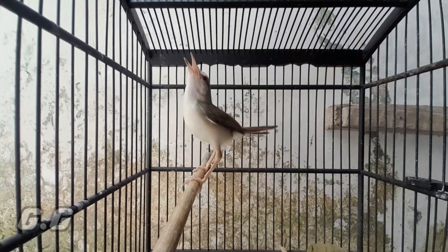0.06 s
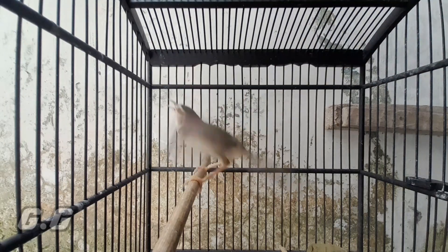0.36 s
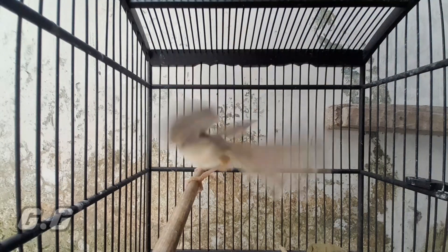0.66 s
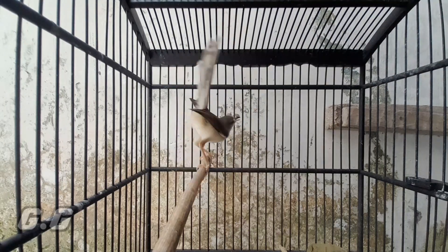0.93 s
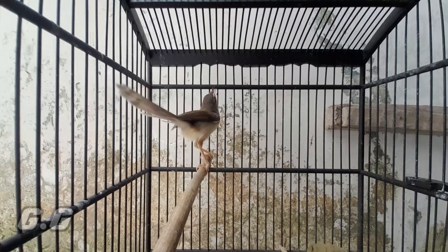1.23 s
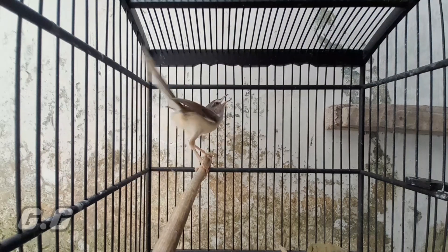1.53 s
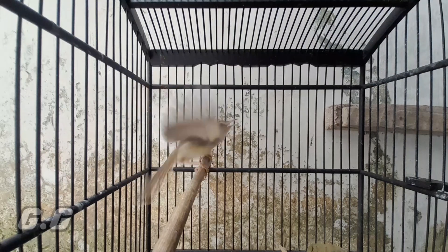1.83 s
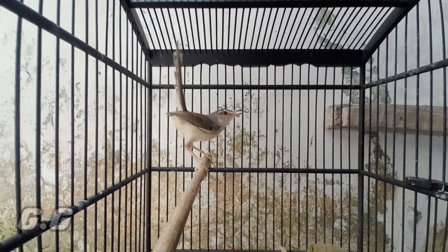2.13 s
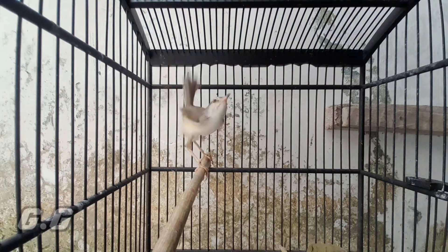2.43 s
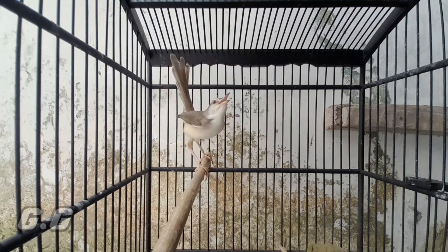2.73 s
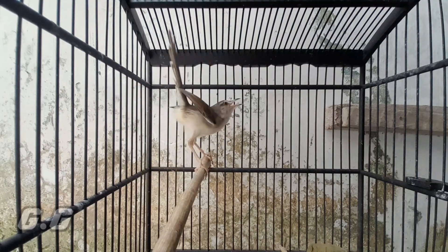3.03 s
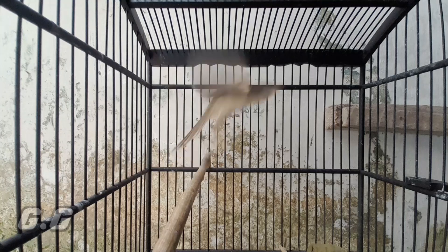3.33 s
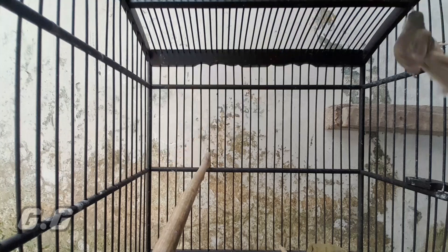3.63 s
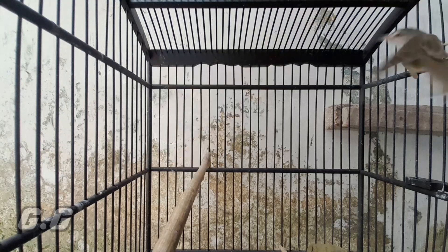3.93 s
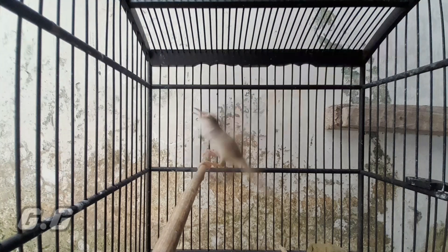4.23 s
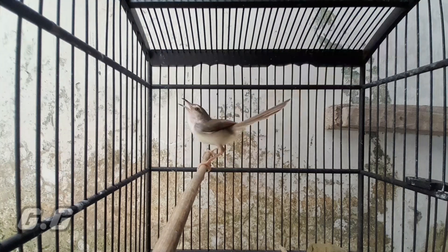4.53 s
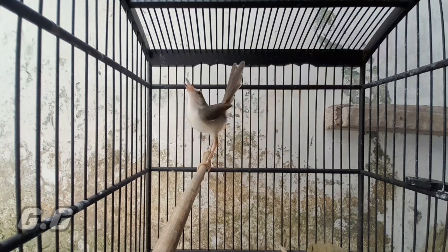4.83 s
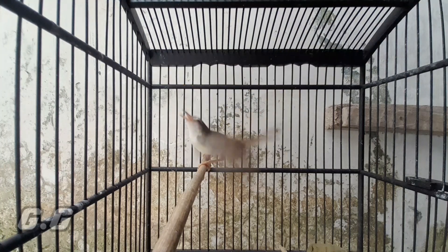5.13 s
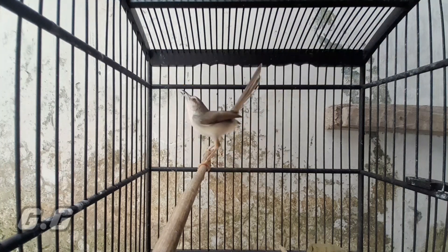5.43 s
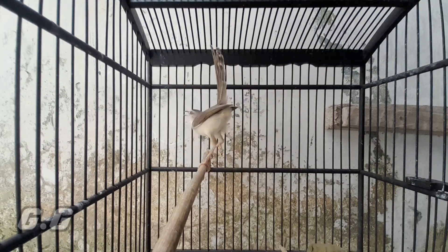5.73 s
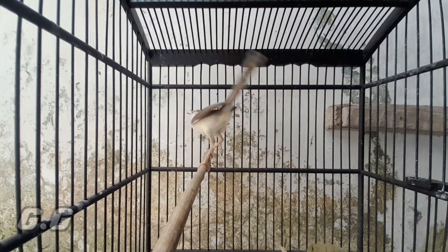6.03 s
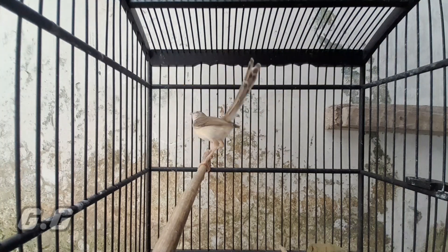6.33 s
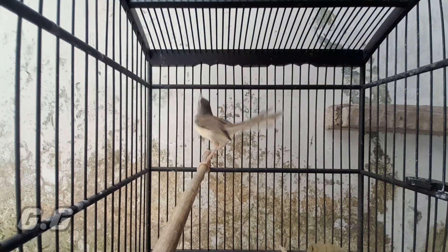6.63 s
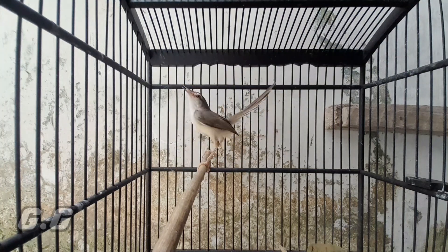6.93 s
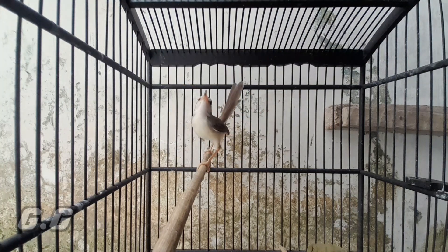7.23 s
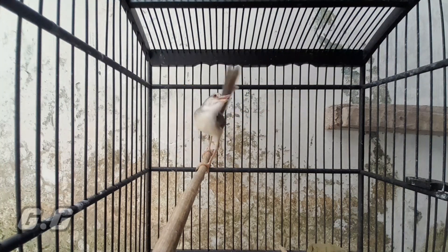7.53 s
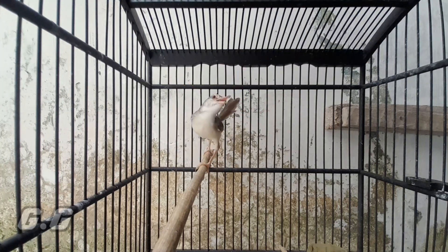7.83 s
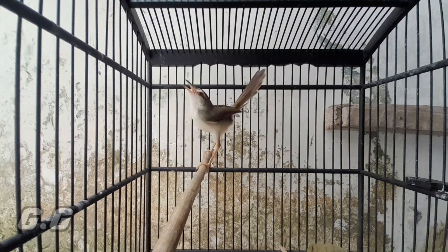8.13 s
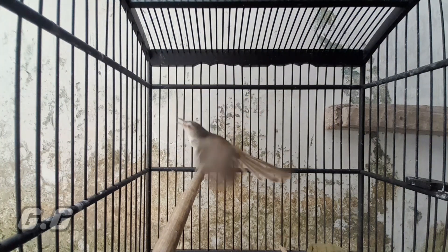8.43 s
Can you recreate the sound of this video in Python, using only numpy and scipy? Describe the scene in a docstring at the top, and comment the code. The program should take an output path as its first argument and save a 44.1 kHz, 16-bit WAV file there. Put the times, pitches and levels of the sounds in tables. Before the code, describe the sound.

Close, high chirps repeat steadily from a caged songbird, mixed with sharp wing flicks over a distant engine hum.

```python
"""A caged prinia close to a stereo microphone, with a street far behind.
From the start it repeats one arching note, a hoarse squeak of the syrinx breaking into a whistle,
and snaps its wings as it hops; the nearby walls ring. Farther off, other birds tick and whistle.
From about 1 s its claws now and then scratch perch and bars. It rests just after 2 s, sings on as
a far engine's hum swells toward 5.5 s, rests again just after 6 s, then sings to the end."""
import sys
import numpy as np
from scipy import signal
from scipy.fft import rfft, irfft, next_fast_len
from scipy.io import wavfile

SR = 44100
rng = np.random.default_rng(int(sys.argv[2]) if len(sys.argv) > 2 else 0)


def pcm_store(signal):
    """Save signal as 16-bit PCM."""
    levels = np.round(np.clip(np.atleast_2d(signal), -1, 1) * 32767)
    wavfile.write(sys.argv[1], SR, levels.astype(np.int16).T)


N = 377937

# Levels in the tables are relative: each source adds its own gain.
# the far street swells and ebbs: t/s, engine level/dB, traffic level/dB
STREET_LEVELS = [(0.0, -61, -64), (2.0, -54, -62.5), (2.51, -61, -69.5), (2.86, -55, -62.5),
                 (3.15, -53, -63.5), (3.77, -57.5, -64), (4.58, -50, -59.5), (5.66, -49, -56),
                 (6.49, -56, -60.5), (6.95, -51.5, -57), (8.28, -56.5, -65.5), (8.57, -55.5, -62)]
# partials of the far engine: multiple of the hum, level/dB
ENGINE_ORDERS = [(.5, -12), (.75, -10.5), (1, 0.5), (1.5, -15.5), (2, -19.5), (3, -20)]
# spectrum of the traffic wash: f/Hz, level/dB
TRAFFIC_COLOUR = [(25, -17.5), (60, -5), (100, 4), (160, 4), (260, -6.5), (370, -6), (480, -15.5),
                  (700, -20), (1150, -28.5), (1450, -25.5), (2500, -27.5), (6000, -39.5), (15500, -54.5)]
# another engine pulls away far off: t/s, length/s, first f/Hz, last f/Hz, level/dB
REVS = [(-.2, .8, 187, 202, -56.5), (2.3, 1.5, 180, 204.4, -56)]
# a distant bird's soft slurs: t/s, length/s, first f/Hz, last f/Hz, level/dB
SLURS = [(0.239, 0.11, 1640, 1614, -67), (0.903, 0.21, 1494, 1500, -64.5), (5.843, 0.097, 1300, 1500, -63),
         (6.132, .15, 1430, 1298, -61), (7.842, 0.1, 1444, 1330, -65), (8.3, 0.13, 1380, 1356, -60)]
# a second bird ticks in even runs: first t/s, last t/s, level/dB
TICK_RUNS = [(0.242, 0.688, -48), (2.155, 2.327, -47.5), (2.546, 2.903, -51), (4.815, 5.446, -44.5),
             (5.799, 6.377, -41.5), (6.466, 6.559, -43)]
# ring of the walls around the cage: f/Hz, t60/s
WALL_DECAY = [(100, 0.098), (600, 0.44), (2000, 0.33), (3900, 0.42), (7000, 0.22), (12000, 0.4),
              (16000, 0.08)]
# the raised bill beams its overtones at the walls, so they return stronger: f/Hz, level/dB
WALL_COLOUR = [(300, 2.5), (1000, 1), (2500, 6), (3900, 1.5), (5600, 4), (8000, 4), (12000, 0), (16000, -5)]
# claws grip perch and bars: t/s, level/dB
GRIPS = [(0.964, -40), (1.047, -44), (3.6117, -27), (3.643, -37), (4.131, -37), (4.385, -44)]
# wing flicks, each one or two strokes, a push of air and a ruffle: last stroke t/s, strokes,
# level/dB, growth per stroke/dB, treble/dB, left-right/dB, air level/dB, ruffle level/dB
FLICKS = [(0.429, 2, -22.5, -2.5, 3.5, 4.5, -33, -62), (0.798, 2, -20, -0.5, -0.5, -3, -37, -63),
          (1.109, 1, -20, -3, 4.5, 8, -44, -64), (1.519, 2, -21, 2, 1.5, -4.5, -38, -46.5),
          (1.886, 1, -25, 2, 7.5, -5, -40, -50.5), (2.423, 1, -26.5, -2, 2, 3.5, -48, -76),
          (2.945, 2, -20, 2.5, 4.5, 4.5, -38.5, -60), (3.383, 2, -19, 8.5, 1, -4, -37.5, -66),
          (4.018, 1, -24.5, 0, -0.5, -8, -55, -62), (4.309, 2, -21.5, -3.5, 0, -5, -42, -50),
          (4.734, 2, -18, 14.5, 1, -3.5, -41.5, -52.5), (5.248, 2, -21, 2.5, 4.5, 4.5, -43, -57),
          (5.643, 2, -20, 7, 0.5, -6, -45, -68), (6.036, 2, -23.5, 14.5, 0.5, 2.5, -55, -57),
          (6.479, 1, -22.5, -1, -1, -2.5, -55, -71), (7.497, 2, -23, 6, -5, -7.5, -56, -50.5),
          (8.087, 2, -21, 5, 1, -2, -42, -54), (8.544, 2, -24.5, 5.5, 1.5, 0, -40, -44)]
# spectrum of a wing snap: f/Hz, level/dB
SNAP_COLOUR = [(30, -27), (70, -3), (150, -3), (300, 6.5), (580, 6), (800, -4.5), (1020, 0.5), (1400, -5.5),
               (2000, -11), (2600, -28), (4500, -20.5), (6500, -39.5), (10000, -21), (15500, -23)]
# what the throat and open bill pass of the weak partials: f/Hz, level/dB
THROAT = [(1500, -65.5), (2000, -63.5), (3800, -53), (4600, -42), (5100, -42), (5450, -41.5), (5750, -62),
          (6150, -55.5), (6700, -57), (7600, -59), (8300, -56.5), (9700, -67.5), (12000, -52), (14500, -66)]
# overtones of the whistle: multiple, level against the whistle/dB
OVERTONES = [(3, -30), (4, -36.5)]
# the prinia's notes, each shifting between left and right: t/s, length/s, pitch factor, crest level/dB,
# fall level/dB, crest left-right/dB, fall left-right/dB, lead at the left microphone/ms
NOTES = [(-0.016, 0.24, 1, 0.5, -1.5, 0.5, 0.5, .24), (0.344, 0.25, 1.002, -1.5, -2, -5.5, 4, 0.24),
         (0.711, 0.25, 0.99, 3.5, -3, 9, -5.5, 0.1146), (1.076, 0.24, 0.99, -6.5, 0, 0, 2.5, .16),
         (1.44, 0.24, 0.99, 1.5, 1, -1.5, 4.5, 0.13), (1.805, 0.25, 1, 1.5, -2.5, 0, 13.5, 0.17),
         (2.617, 0.242, 1.008, 2, -1.5, -2.5, 4, 0.16), (2.978, 0.24, 1, -0.5, -3.5, 5, 7.5, 0.1),
         (3.334, 0.25, 0.99, -2, -5, -2.5, -5, 0.16), (3.728, 0.23, 1, -2.5, -1.5, 9, -5.5, 0.091),
         (4.088, 0.23, 0.99, 0.5, -2.5, -3, 1, 0.18), (4.457, 0.23, 1, -0.5, 0.5, 12, 2, 0.21),
         (4.826, 0.24, 1, -2, -1.5, -3, 7, .21), (5.181, 0.24, 1, -2.5, -3, 7.5, -3.5, 0.21),
         (5.548, 0.24, 0.9985, -7, -2, -5, -4, 0.21), (5.923, 0.24, 1.003, -7.5, -1.5, 10, -12, 0.2),
         (6.65, 0.24, 1.01, -2, -0.5, 6.5, 1, 0.21), (7.014, 0.24, 1.005, 0, 0, -9.5, 14.5, .18),
         (7.383, 0.25, 1.002, 0, -2.5, -13.5, 9, .15), (7.761, 0.24, 1.001, -1, -0.5, -14.5, 11, 0.14),
         (8.126, 0.24, 1.005, -4.5, -1.5, -3, 9, 0.19), (8.486, 0.35, 1, -7.5, -2, -11, -1, .19)]

# times into a note at which its two levels and left-right balances apply
CREST_S, FALL_S = .11, 0.21
# a note opens as a hoarse squeak that scoops up and keeps climbing
SQUEAK_HZ, SCOOP_HZ, SCOOP_S, CLIMB_HZ_PER_S = 3311, 853.5, 0.0076, 4500
# the rasp, and the hiss that comes with it, die away as the membranes settle
RASP_S, HISS_S = 0.079, 0.033
# the voice breaks upward into a pure whistle
BREAK_S, BREAK_WIDTH_S = 0.074, .007
# the whistle holds its top, sags toward a resting pitch and droops as it is cut off
TOP_HZ, HOLD_UNTIL_S, REST_HZ, SAG_S, DROOP_HZ = 4102, .118, 3404.6, .16, 45
# the note swells ever more slowly, holds and is cut off; its crest and fall levels ride on top
HELD_DB, SWELL_DB, SWELL_S, SWELL_POWER, RELEASE_S = -12.5, 33, .19, 1.71, 0.019
# weak partials bite at the onset, stay strong in the squeak, thin at the break and return at the close
BITE_DB, BITE_S, SQUEAK_DB, THIN_DB, RETURN_DB, RETURN_S = 7.5, 0.012, 2, -6, 10, .03


def amp(db):
    """Decibels to gain."""
    return 10 ** (np.asarray(db) / 20)


def unit(x):
    """Scales to rms 1."""
    return x / np.sqrt(np.mean(x ** 2) + 1e-20)


def read(points, hz):
    """Reads a curve on a log-frequency axis."""
    f, value = np.transpose(points)
    return np.interp(np.log(hz + 1), np.log(f + 1), value)


def add(mix, s, sound):
    """Mixes a sound in at time s."""
    at = round(s * SR)
    sound = sound[..., max(-at, 0):]
    part = mix[:, max(at, 0):][:, :sound.shape[-1]]
    part += sound[..., :part.shape[1]]


def pan(db):
    """Left and right gains for a level difference at the microphone."""
    return unit(amp([[db / 2], [-db / 2]]))


def noise(colour, n):
    """Two channels of noise of rms 1, coloured by points of f/Hz, level/dB."""
    size = next_fast_len(n, real=True)
    white = rng.standard_normal((2, size))
    gain = amp(read(colour, np.fft.rfftfreq(size, 1 / SR)))
    return unit(irfft(rfft(white) * gain, size)[:, :n])


def wander(n, hz, step=16):
    """A smooth random curve of rms about 1, rolling off above hz."""
    count = next_fast_len(n // step + 512, real=True)
    f = np.fft.rfftfreq(count, step / SR)
    slow = unit(irfft(rfft(rng.standard_normal(count)) / (1 + (f / hz) ** 4), count))
    return np.interp(np.arange(n) / step, np.arange(count), slow)


def pulse(db):
    """The shortest (minimum-phase) pulse that has this spectrum."""
    cepstrum = irfft(np.log(amp(db)))
    half = len(cepstrum) // 2
    cepstrum[1:half] *= 2
    cepstrum[half + 1:] = 0
    return irfft(np.exp(rfft(cepstrum)))


def slur(length_s, first_hz, last_hz, shake):
    """One sliding, slightly shaky tone."""
    n = int(length_s * SR)
    hz = np.geomspace(first_hz, last_hz, n) * (1 + shake * wander(n, 400))
    return np.sin(2 * np.pi * np.cumsum(hz) / SR) * signal.windows.tukey(n, .5)


def street(hum_hz=123, waver=0.01796, uneven=.35, throb_hz=11.5, throb=0.5,
           engine_gain_db=3, traffic_gain_db=6, width=0.43, hiss_db=-77):
    """Far behind the cage: an engine's uneven hum over a low wash of traffic and a steady hiss."""
    t = np.arange(N) / SR
    s, hum_db, traffic_db = np.transpose(STREET_LEVELS)
    cycles = np.cumsum(hum_hz * (1 + waver * wander(N, 6.1))) / SR
    hum = sum(amp(db) * (1 + uneven * wander(N, 18)) * np.sin(2 * np.pi * k * cycles)
              for k, db in ENGINE_ORDERS)
    hum *= 1 + throb * np.sin(2 * np.pi * cycles * throb_hz / hum_hz)
    engine = unit(hum) * amp(np.interp(t, s, hum_db) + engine_gain_db)
    mid, side = noise(TRAFFIC_COLOUR, N)
    traffic = np.array([mid + width * side, mid - width * side])
    traffic *= amp(np.interp(t, s, traffic_db) + traffic_gain_db)
    hiss = noise([(300, -6), (1500, 13.5), (3000, -1.5), (16000, -15.5)], N)
    return engine + traffic + amp(hiss_db) * hiss


def engine_pulling_away():
    """Far off: a faint drone that climbs as the engine gathers speed."""
    out = np.zeros((2, N))
    for s, length_s, first_hz, last_hz, db in REVS:
        add(out, s, amp(db) * slur(length_s, first_hz, last_hz, shake=0.029))
    return out


def distant_bird():
    """Far off: a bird's low, wavering whistles."""
    out = np.zeros((2, N))
    for s, length_s, first_hz, last_hz, db in SLURS:
        add(out, s, amp(db) * slur(length_s, first_hz, last_hz, shake=0.047))
    return out


def ticking_bird(tick_s=.017, gap_s=0.091, high_hz=5100, low_hz=2750, gain_db=-11, uneven_db=0.5):
    """Beyond the cage: a second bird, each tick a very quick downward sweep."""
    out = np.zeros((2, N))
    for first, last, db in TICK_RUNS:
        for s in np.linspace(first, last, round((last - first) / gap_s) + 1):
            level = amp(db + gain_db + uneven_db * rng.standard_normal())
            add(out, s, level * slur(tick_s, high_hz, low_hz, shake=0.0094))
    return out


def walls(sound, gap_s=0.0055, density=.1):
    """Around the cage: sparse reflections, each band dying at its own speed."""
    taps = rng.choice([-1., 1.], (2, SR)) * (rng.random((2, SR)) < density)
    taps[:, :int(gap_s * SR)] = 0
    hz, t, bands = signal.stft(taps, SR, nperseg=256)
    decay_db = 60 * t / read(WALL_DECAY, hz)[:, None]
    bands = bands * amp(read(WALL_COLOUR, hz)[:, None] - decay_db)
    tail = signal.istft(bands, SR, nperseg=256)[1]
    return signal.fftconvolve(sound, tail / np.linalg.norm(tail[0]), axes=1)[:, :N]


def claws(gain_db=-3, click_s=0.001, scrape_db=-15, scrape_s=.014):
    """In the cage: a dry tick and a short scrape as claws grip perch or bars."""
    out, t = np.zeros((2, N)), np.arange(3000) / SR
    colour = [(300, -7.5), (1200, 2), (2500, -17.5), (6000, -3), (11000, 16), (16000, 8.5)]
    envelope = np.exp(-t / click_s) + amp(scrape_db) * np.exp(-t / scrape_s)
    for s, db in GRIPS:
        add(out, s, amp(db + gain_db) * noise(colour, len(t)) * envelope)
    return out


def feathers(grain_db=4, grain_hz=250, half_width_s=.04, early_s=.015, grip_db=-24):
    """In the cage: vanes rub over each other in small uneven catches at each flick and grip."""
    t = np.arange(N) / SR
    ruffles = [(s - early_s, db) for s, *_, db in FLICKS] + [(s, db + grip_db) for s, db in GRIPS]
    envelope = sum(amp(db) * np.exp(-((t - s) / half_width_s) ** 2) for s, db in ruffles)
    rub = noise([(300, -7.5), (1200, 1), (2600, -8.5), (6000, -7), (11000, -2.5), (16000, -5.5)], N)
    return envelope * unit(rub * amp(grain_db * wander(N, grain_hz))) * pan(2.4)


def wing_air(push_hz=60, half_width_s=0.016, late_s=0.0038):
    """The last downstroke of a flick pushes one soft swing of air at the microphone."""
    out, t = np.zeros((2, N)), np.arange(-3000, 3000) / SR
    push = np.sin(2 * np.pi * push_hz * t) * np.exp(-(t / half_width_s) ** 2) * pan(2)
    for s, *_, air_db, _ in FLICKS:
        add(out, s + late_s + t[0], amp(air_db) * push)
    return out


def strokes(gap_s=.031):
    """Every wing stroke of every flick: t/s, level/dB, treble/dB, left-right/dB."""
    return [(s - k * gap_s, db - k * growth_db, treble_db, side_db)
            for s, count, db, growth_db, treble_db, side_db, _, _ in FLICKS for k in range(round(count))]


def wing_snaps(gain_db=2, late_s=0.0037, slap_s=0.00123, slap=0.62, echo_start_s=.0172, echo_db=-17,
               swish_db=-37, swish_s=0.022, rip_db=-19, rip_s=0.0033):
    """Close up: each stroke cracks like a small whip amid a swish of feathers; a wall returns it."""
    out, t = np.zeros((2, N)), np.arange(-3000, 3000) / SR
    hz = np.fft.rfftfreq(4096, 1 / SR)
    snap_db = read(SNAP_COLOUR, hz)
    peak = abs(pulse(snap_db)).max()
    swish_colour = [(200, 1.5), (700, 13.5), (2500, 0), (5000, -5), (11000, -6), (16000, -18.5)]
    swish = amp(swish_db) * np.exp(-abs(t) / swish_s)
    rip = amp(rip_db) * np.exp(-abs(t - rip_s / 2) / rip_s)
    for s, db, treble_db, side_db in strokes():
        s += late_s
        tilt_db = read([(2000, 0.007), (7000, treble_db)], hz)
        crack = pulse(snap_db + tilt_db) / peak * amp(db + gain_db) * pan(side_db)
        add(out, s, crack)
        add(out, s + slap_s * rng.uniform(0.67, 1.3), slap * crack)
        add(out, s + echo_start_s, amp(echo_db) * crack[::-1])  # reversed: peaks 93 ms after its start
        add(out, s + t[0], noise(swish_colour, len(t)) * (swish + rip) * amp(db + treble_db))
    return out


def syrinx_pitch(age, remaining, clear, jitter=0.018, jitter_hz=500, drift=0.003):
    """Pitch in Hz: a rasping, climbing squeak gives way to a sagging whistle as clear goes 0 to 1."""
    squeak_hz = SQUEAK_HZ - SCOOP_HZ * np.exp(-age / SCOOP_S) + CLIMB_HZ_PER_S * age
    sag = np.exp(-np.maximum(age - HOLD_UNTIL_S, 0) / SAG_S)
    whistle_hz = REST_HZ + (TOP_HZ - REST_HZ) * sag - DROOP_HZ * np.exp(-remaining / RELEASE_S)
    rasp = jitter * np.exp(-age / RASP_S) * wander(len(age), jitter_hz)
    return (squeak_hz + clear * (whistle_hz - squeak_hz)) * (1 + rasp + drift * wander(len(age), 60))


def scattered_partials(levels, cycles, flutter_db=2.5, swell_db=3.5, scatter_rad=1.89):
    """Partials scatter off the bars: each swells unevenly and reaches left and right out of step."""
    n, partials = len(cycles), 0
    for multiple, db in levels:
        uneven_db = flutter_db * wander(n, 110) + swell_db * wander(n, 15)
        shift = np.array([[.5], [-.5]]) * scatter_rad * wander(n, 16)
        partials += amp(db + uneven_db) * np.sin(2 * np.pi * multiple * cycles + shift)
    return partials * pan(3)


def note(row, onset_s=0.01, flutter_db=1.75, overtone_growth=0.95, weak_db=-1.5, partial_fade_s=0.023,
         hiss_db=-51, hiss_early_s=0.0076):
    """The syrinx sounds an octave below the whistle; the throat favours its second partial."""
    start, length, pitch, crest_db, fall_db, pan_crest, pan_fall, lead_ms = row
    t = np.arange(-hiss_early_s, length + 0.0034, 1 / SR)
    n, age, remaining = len(t), np.maximum(t, 0), t[-1] - t
    clear = .5 + .5 * np.tanh((age - BREAK_S) / (2 * BREAK_WIDTH_S))
    hz = pitch * syrinx_pitch(age, remaining, clear)
    cycles = np.cumsum(hz) / SR
    db = HELD_DB - SWELL_DB * np.maximum(1 - age / SWELL_S, 0) ** SWELL_POWER
    db += np.interp(age, [0, CREST_S, FALL_S], [0, crest_db, fall_db])
    # the level shifts between left and right as the gliding pitch interferes with a wall reflection
    side = np.array([[.5], [-.5]])
    swing = amp(side * clear * np.interp(age, [CREST_S, FALL_S], [pan_crest, pan_fall]))
    swing /= np.sqrt((swing ** 2).mean(0))
    tone = np.sin(2 * np.pi * (cycles + side * hz * lead_ms / 1000))
    release = np.sin(np.pi / 2 * np.minimum(remaining / RELEASE_S, 1)) ** 2
    whistle = amp(db + flutter_db * wander(n, 30)) * tone * swing * release
    # overtones follow the whistle's level; the weak partials follow the throat
    reedy_db = BITE_DB * np.exp(-age / BITE_S) + SQUEAK_DB * (1 - clear)
    reedy_db += THIN_DB * np.sin(np.pi * clear) + RETURN_DB * np.exp(-remaining / RETURN_S)
    overtone_db = db.max() + overtone_growth * (db - db.max())
    levels = [(k, overtone_db + level) for k, level in OVERTONES]
    levels += [(k, read(THROAT, k * hz) + reedy_db + weak_db) for k in (.5, 1.5, 2, 2.5, 3.5)]
    partials = scattered_partials(levels, cycles) * np.minimum(remaining / partial_fade_s, 1)
    voice = np.sqrt(2) * (whistle + partials) * np.minimum(age / onset_s, 1)
    hiss = noise([(700, -10.5), (1600, -2.5), (2600, -8), (4800, 1.5), (6500, -4.5), (9000, -15),
                  (12000, -7), (16000, -14.5)], n)
    voice += amp(hiss_db) * np.exp(-age / HISS_S) * hiss
    return start + t[0], voice * signal.windows.tukey(n, .04)


def prinia():
    """Close to the microphone: the caged bird's run of notes."""
    out = np.zeros((2, N))
    for row in NOTES:
        add(out, *note(row))
    return out


def scene(song_wet_db=-17, moves_wet_db=-12, far_wet_db=-3):
    """The cage close by, the other birds farther off, the street behind."""
    song = prinia()
    moves = wing_snaps() + feathers() + claws()
    far_birds = ticking_bird() + distant_bird()
    ring = walls(amp(song_wet_db) * song + amp(moves_wet_db) * moves + amp(far_wet_db) * far_birds)
    return street() + engine_pulling_away() + far_birds + ring + wing_air() + moves + song


def record(dry):
    """The recorder passes nothing above about 16 kHz."""
    lowpass = signal.firwin(511, cutoff=15850, window=("kaiser", 9), fs=SR)
    return signal.oaconvolve(dry, lowpass[None], "same")


dry = scene()
out = record(dry)
pcm_store(out)
```